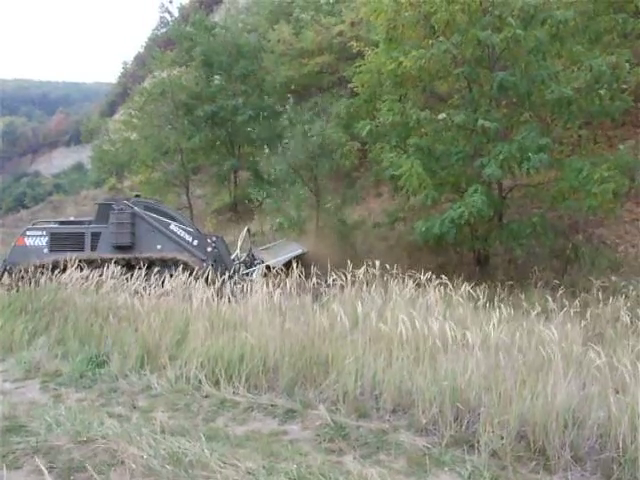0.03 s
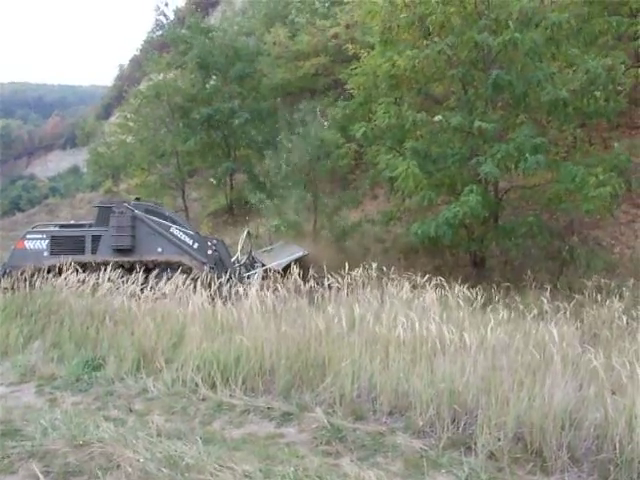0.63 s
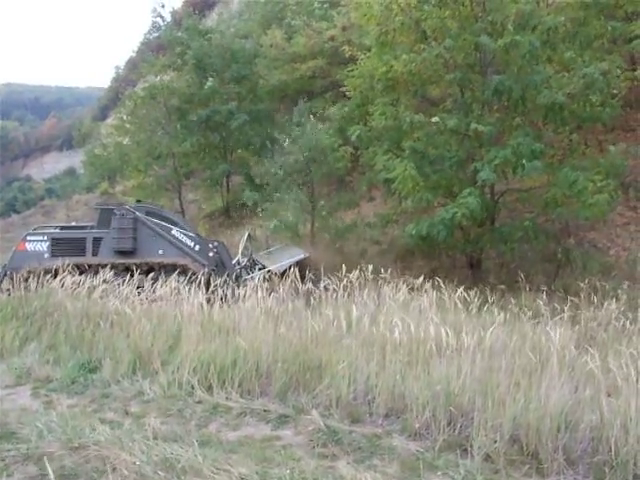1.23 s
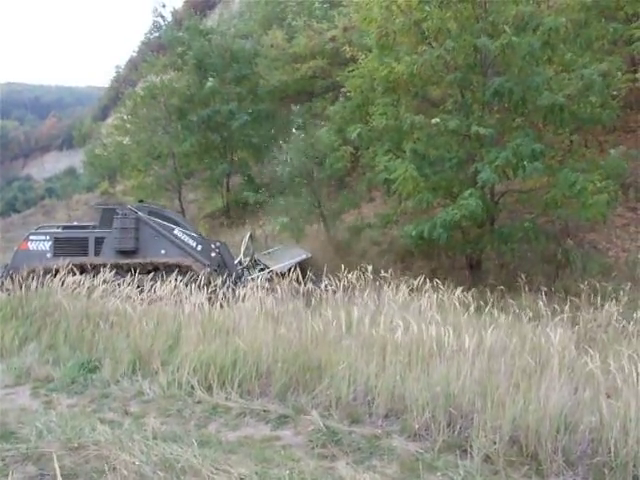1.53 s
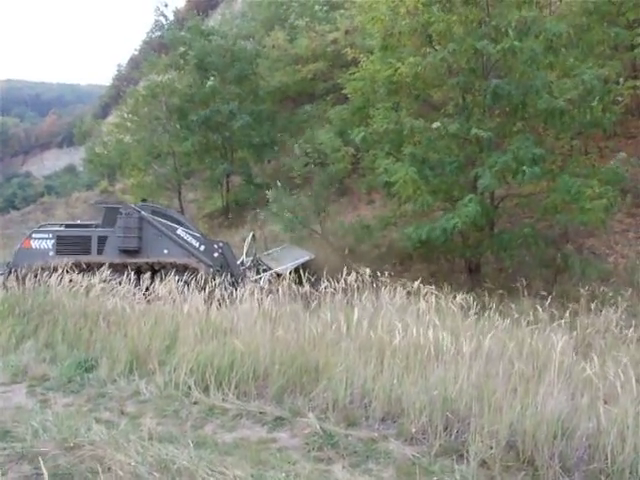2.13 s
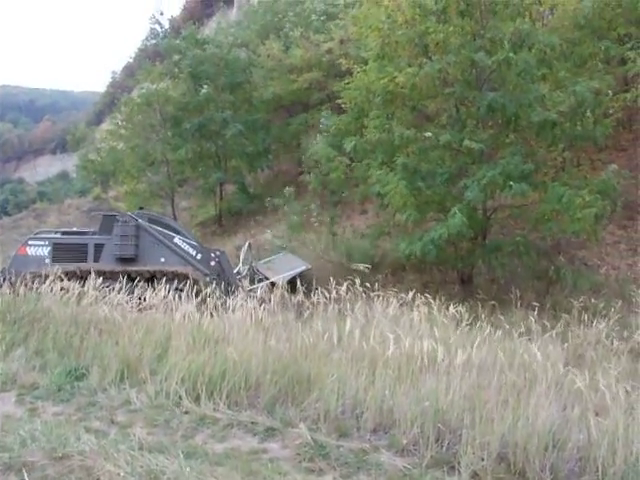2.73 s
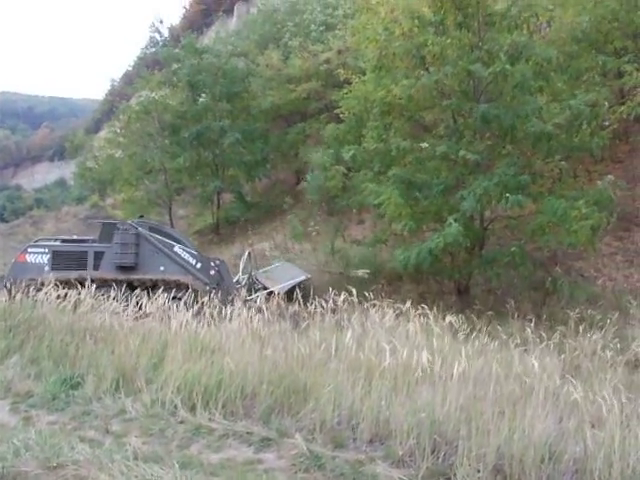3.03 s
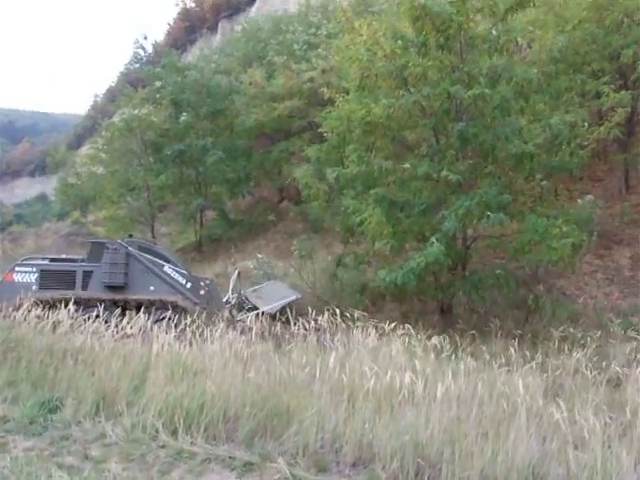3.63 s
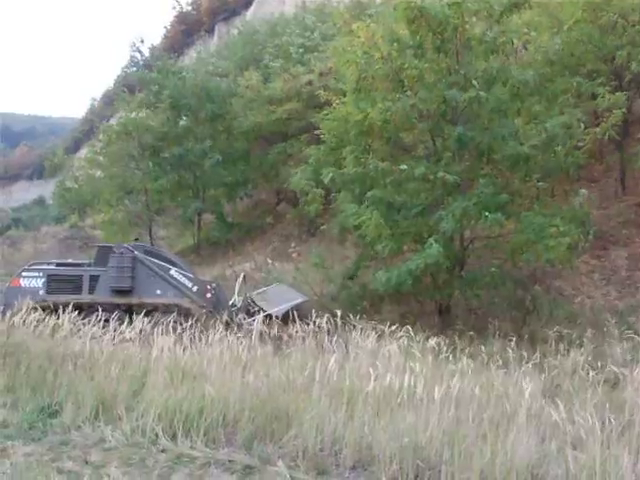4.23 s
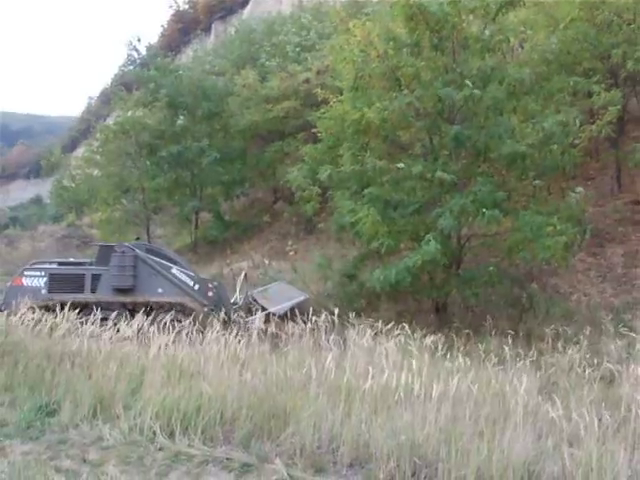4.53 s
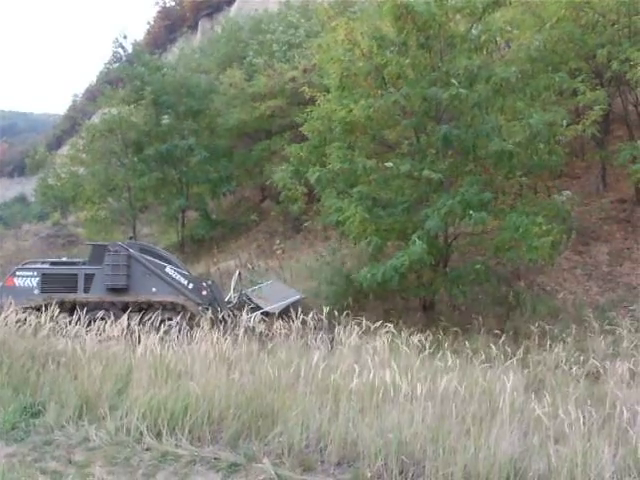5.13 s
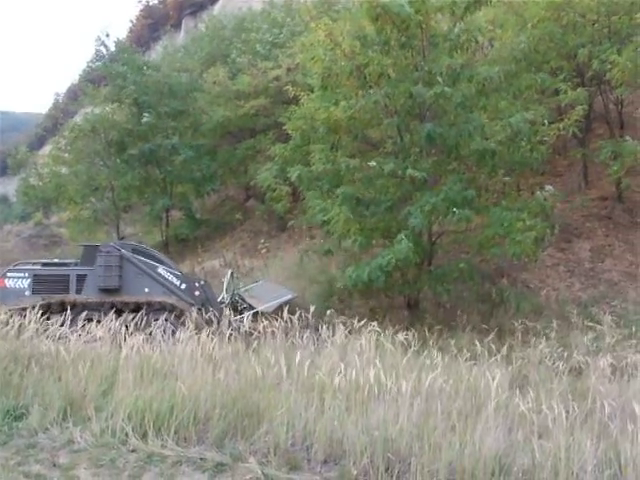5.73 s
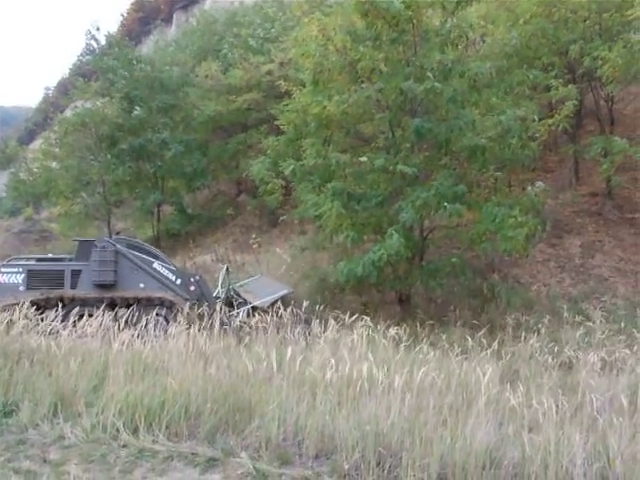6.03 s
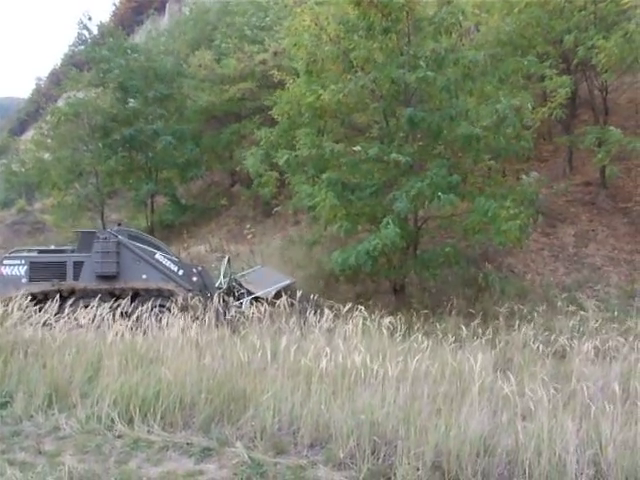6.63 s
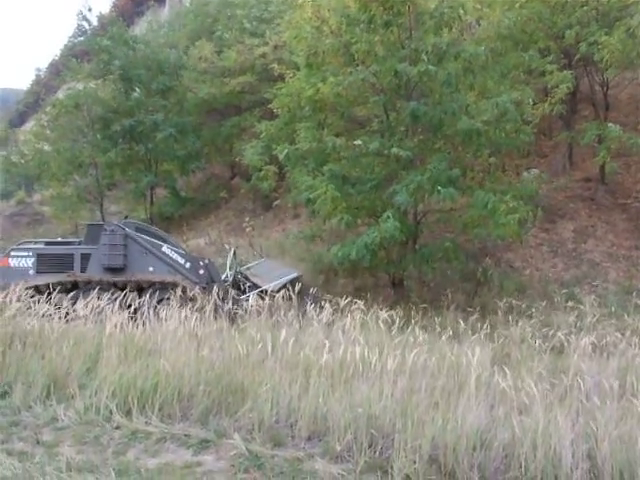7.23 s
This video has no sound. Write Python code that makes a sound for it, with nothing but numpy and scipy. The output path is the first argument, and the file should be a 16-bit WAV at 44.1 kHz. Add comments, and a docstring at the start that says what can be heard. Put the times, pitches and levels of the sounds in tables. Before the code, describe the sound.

Twigs crack over the steady diesel drone, roar and hiss of a mulching machine chewing through brush.

```python
"""Twigs crack over a diesel drone and a loud hiss: a tracked mulcher is chewing through brush.
Its four-cylinder engine holds a nearly steady speed, sagging a little under load, and its gears whine.
The flail head, a spinning drum that beats the brush apart, roars, rumbles and hisses with torn stalks.
Twigs snap mostly at first, clods of soil thud in the head, and a few thick pieces knock on the hood."""
import sys
import numpy as np
from scipy import signal
from scipy.fft import rfft, irfft
from scipy.io import wavfile
from scipy.ndimage import map_coordinates

SR = 44100
rng = np.random.default_rng(int(sys.argv[2]) if len(sys.argv) > 2 else 0)


def bounce(signal):
    """Save signal as a 16-bit WAV file at the path given by the first command-line argument."""
    frames = np.transpose(np.atleast_2d(signal))
    limited = np.clip(frames, -1, 1)
    pcm = np.round(limited * 32767).astype(np.int16)
    wavfile.write(sys.argv[1], SR, pcm)


N = 321930
TIME = np.arange(N) / SR

# how fast the engine runs: time_s, firings_per_s
ENGINE_SPEED = [(0, 72.74), (.35, 73.0), (.95, 72.63), (1.4, 72.98), (2.2, 73.98), (2.6, 74.06), (4, 74.06),
                (4.5, 73.93), (5, 73.64), (5.72, 72.63), (6.2, 73.33), (7.3, 73.67)]
# how hard the machine works: time_s, gain_db
EFFORT = [(0, 1.4), (.4, -2), (.75, -2), (1.1, -0.4), (1.65, 0.4), (2.3, -1.3), (2.65, -0.5), (4.8, 0.54),
          (5.3, 1.7), (5.85, 2.25), (7.3, 1.65)]
# engine tones that stand out, at multiples of its cycle rate: multiple, free_db, strained_db
STRONG_TONES = [(4, -25.5, -25.5), (8, -35.5, -34.5), (9, -46, -46), (16, -51, -51), (18, -44, -44),
                (25, -48, -48), (26, -49.5, -47.5), (27, -42, -49), (28, -44.5, -46), (29, -44.5, -46),
                (35, -43.5, -48), (37, -45.5, -52), (38, -46.5, -52), (39, -44, -46), (40, -46, -46),
                (42, -46, -48.5), (44, -44, -44), (45, -46, -46), (47, -45.5, -44), (48, -49, -46),
                (49, -43.5, -43), (52, -48, -48), (54, -44.5, -49), (55, -45.5, -49), (56, -51.5, -50.5),
                (60, -50, -51), (68, -51, -51), (69, -48, -53), (70, -43, -51), (72, -46, -49),
                (73, -47.5, -47), (74, -44, -47), (75, -44, -48), (77, -46, -47), (80, -48.5, -54.5),
                (81, -49, -51), (84, -48.5, -50), (87, -51, -49.5), (92, -45, -53), (96, -46.5, -51),
                (100, -50.5, -56.5), (105, -51, -54), (108, -53, -53), (122, -51.5, -62), (130, -52, -56)]
# typical level of each of the other engine tones: pitch_hz, level_db
WEAK_TONES = [(40, -49), (150, -63), (330, -61.5), (520, -62), (750, -50), (950, -56.5), (1150, -54),
              (1370, -59), (1650, -56), (2000, -57.5), (2350, -58), (3000, -68), (3700, -63), (4800, -57.5)]
# the two gear whines, at multiples of the cycle rate: multiple, free_db, strained_db
GEAR_WHINES = [(31, -37.8, -43), (36, -36, -40.5)]
# air stirred up by the fan and flail head: pitch_hz, level_db_per_hz
AIR_SPECTRUM = [(150, -68), (250, -75), (370, -75.5), (480, -63.5), (620, -62), (820, -60), (930, -68.5),
                (1150, -68), (1400, -63.5), (1700, -62), (2000, -70), (2400, -67.5), (2900, -79),
                (6000, -92)]
# how that air swells and fades: time_s, gain_db
AIR_SWELL = [(0, -0.5), (.4, -1.6), (.98, -1.5), (1.17, 2), (1.34, -3.5), (1.55, -1), (2.35, -3),
             (2.7, -0.4), (4.5, -1.1), (5.45, -4), (5.85, 0), (6.15, -3), (7.3, -5.5)]
# low rumble of the head: pitch_hz, level_db_per_hz
RUMBLE_SPECTRUM = [(4, -68), (20, -61.5), (31, -59), (42, -61.5), (70, -58), (100, -56), (130, -58.5),
                   (170, -60), (260, -68), (400, -85.5)]
# soil churned in the head: pitch_hz, level_db_per_hz
SOIL_SPECTRUM = [(100, -92.5), (230, -68), (330, -74), (430, -62.5), (700, -92), (1500, -110)]
# how deep the head digs, heard as more or less rumble: time_s, gain_db
DIG_DEPTH = [(0, 0), (.6, 3), (1.55, -1.5), (2.5, 3), (3.6, 1.3), (4.4, 6.5), (5, 0.5), (5.8, 1.2),
             (6.2, -6), (7.3, 0.5)]
# the housing's drone as the head takes a mouthful: start_s, length_s, level_db
BITES = [(0.153, .14, -35), (1.036, 0.41, -32), (4.27, 0.84, -35.5), (5.25, 0.2, -33), (5.975, 1, -35.5)]
# clods thrown against the head: start_s, level_db, pitch_hz
CLODS = [(.215, -27.5, 228), (.435, -27, 105), (0.664, -28, 110), (1.056, -29, 224), (2.386, -28, 114),
         (3.985, -31, 105), (4.285, -26, 310), (4.424, -27, 290), (4.545, -25, 215), (5.71, -43, 300)]
# pieces of wood hitting the hood: start_s, level_db
KNOCKS = [(3.963, -20.5), (4.075, -28), (4.93, -30)]
# the notes the hood rings at: pitch_hz, width_hz, gain_db
HOOD_RINGS = [(970, 220, 8), (1480, 270, -4), (2160, 300, 4), (3170, 1000, -22)]
# breaking twigs, thicker ones splinter for longer: snap_s, level_db, pitch_hz, splinter_s
TWIGS = [(0.075, -15, 6700, 0.0067), (.1216, -12.5, 6620, 0.0033), (.169, -12, 6000, 0.0047),
         (.3135, -12, 6600, 0.0023), (.268, -17, 4650, .0012), (0.366, -15.5, 4700, .0018),
         (0.4028, -9.5, 6200, 0.0022), (.483, -16, 6300, 0.0039), (0.511, -13, 7200, 0.0027),
         (0.5644, -12.5, 6530, 0.0068), (.62, -10.5, 6560, 0.0033), (.696, -12.5, 6800, .003),
         (.768, -16.5, 6600, .005), (.790, -15, 7300, .003), (.857, -16.5, 4230, 0.012),
         (0.907, -10, 6800, 0.0044), (1.064, -17, 6000, 0.0099), (1.161, -12.5, 6100, 0.0088),
         (1.261, -13, 6060, 0.015), (1.355, -14.5, 5400, .013), (2.218, -12.5, 6500, .007),
         (5.196, -17, 5400, 0.0032), (5.951, -16, 6600, .003)]
# hiss of torn stalks, before its overall gain: pitch_hz, level_db_per_hz
HISS_SPECTRUM = [(2000, -77.5), (3000, -88), (3500, -73), (4200, -72), (4800, -65.5), (5500, -60.5),
                 (6200, -65), (6800, -61.5), (7400, -60.5), (8000, -63.5), (8600, -69.5), (9100, -58)]
# how coarse the brush is, as the part of the hiss that crackles: time_s, share_0_to_1
COARSENESS = [(0, 0.6), (.9, 0.5), (1.4, 0.4), (2.2, 0.36), (3.5, 0.1), (5, 0.26), (7.3, .15)]

FIRINGS_PER_CYCLE, DRIVE_BEATS_PER_CYCLE = 4, 3
STRAINED_FIRINGS_PER_S, FREE_FIRINGS_PER_S = 72.8, 73.9


def from_db(db):
    """Turn decibels into a number to multiply by."""
    return 10 ** (np.asarray(db) / 20)


def unit_power(x):
    """Scale a signal so that its average power is 1."""
    return x / np.sqrt(np.mean(x ** 2) + 1e-20)


def over_time(curve):
    """Join a curve's points with straight lines, giving a value for every sample."""
    return np.interp(TIME, *np.transpose(curve))


def level_at(spectrum, hz):
    """Read a spectrum's level between its points, spacing pitches by octaves."""
    pitch_hz, db = np.transpose(spectrum)
    return np.interp(np.log(hz + 1e-3), np.log(pitch_hz), db)


def colour(x, spectrum):
    """Give white noise of power 1 a spectrum in dB per Hz."""
    hz = np.arange(N // 2 + 1) * SR / N
    return irfft(rfft(x) * from_db(level_at(spectrum, hz)), N) * np.sqrt(SR / 2)


def drift(rate_hz):
    """A smooth random wobble of size about 1, mostly slower than rate_hz."""
    hz = np.arange(N // 2 + 1) * SR / N
    return unit_power(irfft(rfft(rng.standard_normal(N)) / (1 + (hz / rate_hz) ** 2), N))


def resonate(x, hz, width_hz):
    """Let a signal ring at one pitch; a narrower width rings for longer."""
    r = np.exp(-np.pi * width_hz / SR)
    feedback = [1, -2 * r * np.cos(2 * np.pi * hz / SR), r * r]
    return signal.lfilter(np.array([1, 0, -1]) * (1 - r * r) / 2, feedback, x + 1e-18)


def cycles(speed):
    """Count the engine cycles so far; each cylinder fires once a cycle."""
    return np.cumsum(speed) / SR / FIRINGS_PER_CYCLE


def strain_at(speed):
    """0 when the engine runs free, 1 when the load has slowed it."""
    return np.interp(speed, [STRAINED_FIRINGS_PER_S, FREE_FIRINGS_PER_S], [1, 0])


def throb(speed, firing_depth, drive_depth):
    """A gain that pulses with the four firings and the three beats of the drive in each cycle."""
    angle = 2 * np.pi * cycles(speed)
    firings = firing_depth * np.cos(FIRINGS_PER_CYCLE * angle)
    return 1 + firings + drive_depth * np.cos(DRIVE_BEATS_PER_CYCLE * angle)


def rushing_air(speed):
    """The fan and flail head stir the air into a roar that throbs with the engine."""
    swirl = rng.standard_normal(N) * throb(speed, firing_depth=0.12, drive_depth=0.27)
    return colour(unit_power(swirl), AIR_SPECTRUM) * from_db(over_time(AIR_SWELL))


def digging(effort_db, depth_db):
    """The head rumbles as it digs in, and churns soil more loudly the harder it works."""
    rumble = colour(rng.standard_normal(N), RUMBLE_SPECTRUM) * from_db(depth_db)
    soil = colour(rng.standard_normal(N), SOIL_SPECTRUM)
    churn_db = 2 * effort_db + 0.33 * depth_db + drift(23)
    return rumble + soil * from_db(churn_db)


def housing_drone(pitch_hz=203.7, rest_db=-41, rise_s=0.05, fall_s=0.095):
    """The head's housing hums; each bite makes the hum swell, hold and fall back."""
    level = np.full(N, from_db(rest_db))
    for start_s, length_s, db in BITES:
        end_s = start_s + length_s
        swell = np.interp(TIME, [start_s - rise_s, start_s, end_s, end_s + fall_s], [0, 1, 1, 0])
        level = np.maximum(level, from_db(db) * swell)
    angle = 2 * np.pi * np.cumsum(pitch_hz + 2.1 * drift(7.5)) / SR
    return np.sin(angle) * level * from_db(2.2 * drift(9))


def gear_whines(speed, depth_db, waver_db=0.9, muffling=0.25):
    """Gears sing in step with the engine, and fade when it strains or the head digs in."""
    cycle, strain, out = cycles(speed), strain_at(speed), 0
    for multiple, free_db, strained_db in GEAR_WHINES:
        db = free_db + strain * (strained_db - free_db) - muffling * depth_db + waver_db * drift(6.9)
        out = out + np.sqrt(2) * from_db(db) * np.sin(2 * np.pi * (multiple * cycle + rng.random()))
    return out


def clods(rise_s=0.006, decay_s=0.051, width_share=0.45):
    """Each clod bursts on the head with a short, dull thud."""
    out = np.zeros(N)
    age_s = np.arange(SR // 4) / SR
    shape = (1 - np.exp(-age_s / rise_s)) * np.exp(-age_s / decay_s)
    for start_s, db, hz in CLODS:
        crumbs = rng.standard_normal(len(age_s)) * shape
        thud = resonate(resonate(crumbs, hz, width_share * hz), hz, width_share * hz)
        thud /= np.sqrt(np.sum(thud ** 2) / (SR // 100))   # as much energy as 10 ms at power 1
        out += np.interp(TIME, start_s + age_s, from_db(db) * thud, left=0, right=0)
    return out


def hood_knocks(decay_s=0.015):
    """A thrown piece of wood rattles briefly in the steel hood."""
    blows = sum(from_db(db) * (TIME > start_s) * np.exp(-np.abs(TIME - start_s) / decay_s)
                for start_s, db in KNOCKS)
    rattle = rng.standard_normal(N)
    ringing = sum(from_db(db) * resonate(rattle, hz, width_hz) for hz, width_hz, db in HOOD_RINGS)
    return blows * unit_power(ringing)


def small_twigs(coarse, tries_per_s=36, level_db=-25.5, pitch_hz=5800, splinter_s=0.0049):
    """Small twigs break at random, far more often in coarse brush; gives rows like those of TWIGS."""
    range_db, range_octaves = 6, 0.91
    rows = []
    for when, luck, size, pitch in rng.random((int(tries_per_s * TIME[-1]), 4)):
        if luck < coarse[int(when * N)] ** 3:
            db = level_db + range_db * (size - 0.5)
            hz = pitch_hz * 2 ** (range_octaves * (pitch - 0.5))
            rows.append((when * TIME[-1], db, hz, splinter_s))
    return rows


def breaking_twigs(coarse, snap_db=-1.5, splinters_db=-5, snap_width_hz=7000, low_cut_hz=1700):
    """Wood fibres give way in a brief crowd of splinters around one sharp snap."""
    out = np.zeros(N)
    age_s = np.arange(-SR // 20, SR // 10) / SR
    click = (age_s == 0).astype(float)
    for snap_s, db, hz, splinter_s in TWIGS + small_twigs(coarse):
        width_hz = 600000 * splinter_s   # longer splintering makes a broader sound
        snap = resonate(resonate(click, hz, width_hz), hz, snap_width_hz)
        snap /= np.sqrt(np.sum(snap ** 2) / (SR // 1000))   # as much energy as 1 ms at power 1
        shape = np.exp(-np.maximum(age_s, -3.7 * age_s) / splinter_s)   # builds faster than it fades
        splinters = unit_power(resonate(rng.standard_normal(len(age_s)), hz, width_hz)) * shape
        crack = from_db(snap_db) * snap + from_db(splinters_db) * splinters
        out += np.interp(TIME, snap_s + age_s, from_db(db) * crack, left=0, right=0)
    return signal.sosfilt(signal.butter(2, low_cut_hz, "high", fs=SR, output="sos"), out)


def shredding(speed, coarse, crackles_per_s=1400, spread_db=1.5, gain_db=-0.56):
    """Countless stalks tear into a hiss that flutters with the drive; coarse ones crackle."""
    sizes = from_db(spread_db * np.minimum(rng.exponential(1, N), 3.5)) * rng.choice([-1, 1], N)
    tears = rng.random(N) < crackles_per_s * from_db(3 * drift(40)) / SR
    crackles = unit_power(sizes * tears)
    stalks = np.sqrt(coarse) * crackles + np.sqrt(1 - coarse) * rng.standard_normal(N)
    flicker_db = 1.11 * drift(33) + 0.43 * drift(2)
    flutter = throb(speed, firing_depth=0.14, drive_depth=0.063) * from_db(flicker_db)
    return colour(unit_power(stalks * flutter), HISS_SPECTRUM) * from_db(gain_db)


def cycle_tones(speed, free_db, strained_db, wander, snapshots=20, size=8192):
    """One engine cycle repeats; its tones shift with the load and wander on their way through the air."""
    strain = strain_at(speed)[np.linspace(0, N - 1, snapshots).astype(int), None]
    steady = np.exp(2j * np.pi * rng.random(len(free_db)))
    chance = rng.standard_normal((snapshots, len(free_db), 2)) @ [1, 1j] / np.sqrt(2)
    level = from_db(free_db + strain * (strained_db - free_db))
    tones = level * steady * (1 + wander * chance) / np.sqrt(1 + wander ** 2)
    waves = irfft(np.pad(tones, ((0, 0), (1, 0))), size) * size / np.sqrt(2)
    # loop the wave at engine speed while blending from each snapshot to the next
    position = [np.linspace(0, snapshots - 1, N), cycles(speed) % 1 * size]
    return map_coordinates(waves, position, order=1, mode="grid-wrap")


def diesel_engine(speed, effort_db, count=260, exhaust_below_hz=350, silent_db=-200):
    """Exhaust beats give the low note; block, valves and pump repeat their clatter once a cycle."""
    hz = np.arange(1, count + 1) * cycles(speed)[-1] / TIME[-1]
    levels_db = level_at(WEAK_TONES, hz) + rng.normal(0, 3.6, (2, count))   # rows: free, strained
    wander = np.full(count, 0.6)
    for multiple, free_db, strained_db in STRONG_TONES:
        levels_db[:, multiple - 1] = free_db, strained_db
        wander[multiple - 1] = 0.22   # strong tones are steadier
    for multiple, _, _ in GEAR_WHINES:   # the gears make these tones
        levels_db[:, multiple - 1] = silent_db
    low = hz < exhaust_below_hz
    exhaust = cycle_tones(speed, *levels_db[:, low], wander=0.042)
    clatter = cycle_tones(speed, *np.where(low, silent_db, levels_db), wander)
    return (exhaust + clatter) * from_db(effort_db)


def scene():
    """Engine and flail head turn together while the brush breaks up."""
    speed, effort_db, depth_db, coarse = map(over_time, (ENGINE_SPEED, EFFORT, DIG_DEPTH, COARSENESS))
    drive = diesel_engine(speed, effort_db) + gear_whines(speed, depth_db)
    head = rushing_air(speed) + digging(effort_db, depth_db) + housing_drone()
    brush = shredding(speed, coarse) + clods() + hood_knocks() + breaking_twigs(coarse)
    return (drive + head + brush)[None]


def record(dry):
    """The treble fades above about 8 kHz and is gone by 9.3 kHz."""
    soft = signal.sosfilt(signal.butter(12, 8100, fs=SR, output="sos"), dry)
    return signal.sosfilt(signal.cheby2(16, 60, 9300, fs=SR, output="sos"), soft)


dry = scene()
out = record(dry)
bounce(out)
```